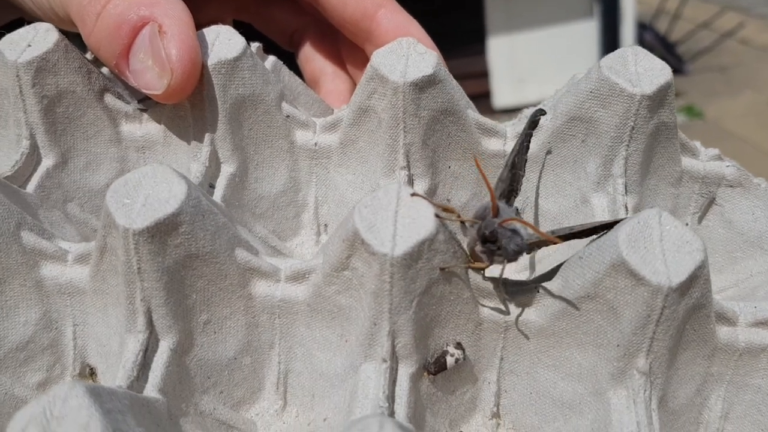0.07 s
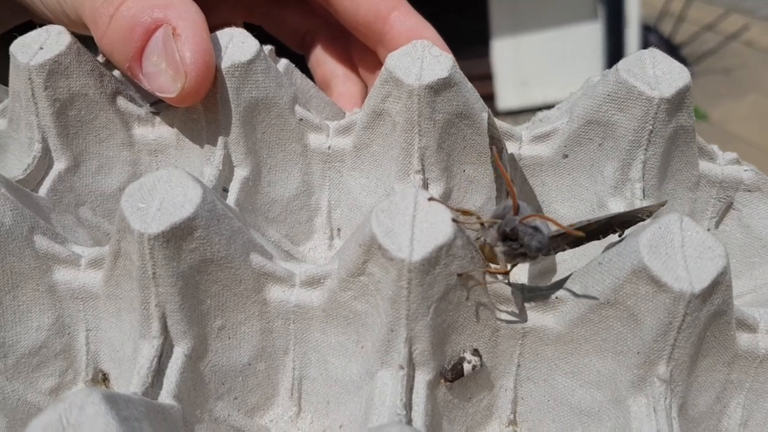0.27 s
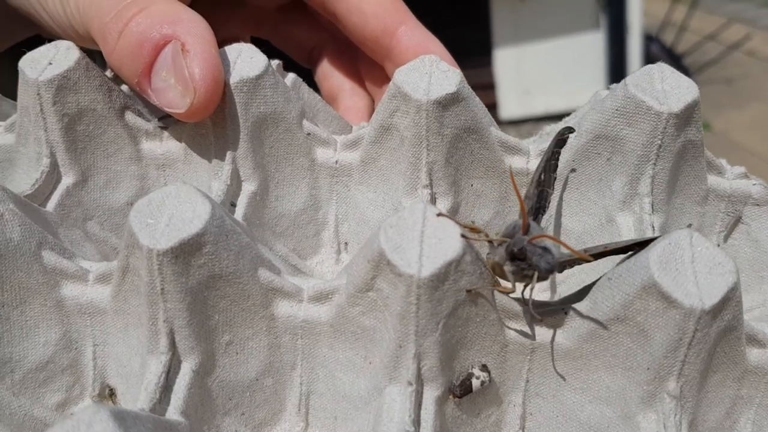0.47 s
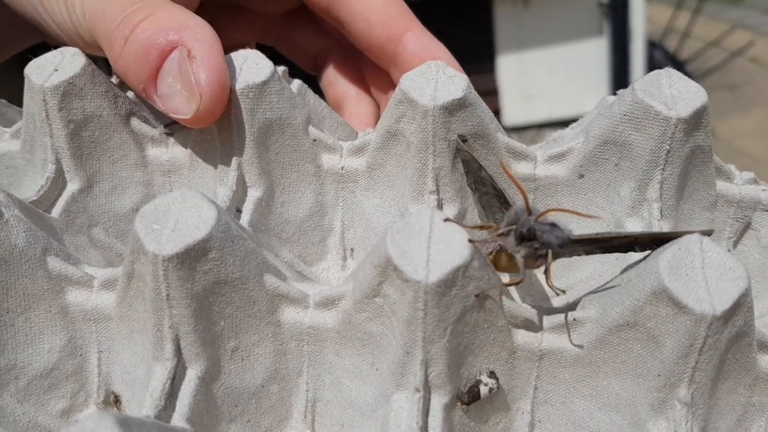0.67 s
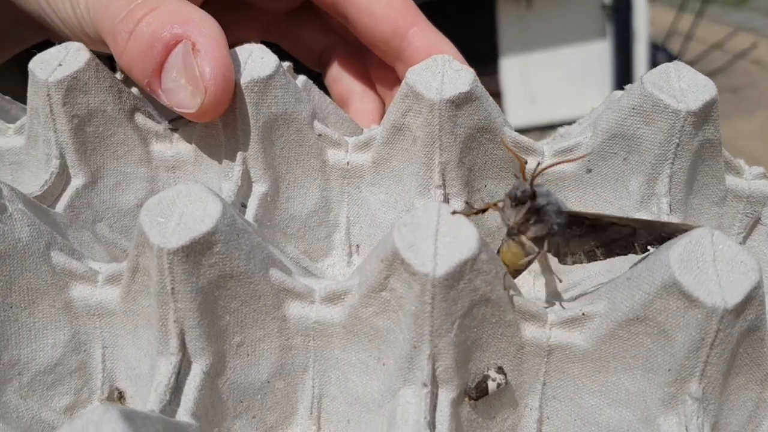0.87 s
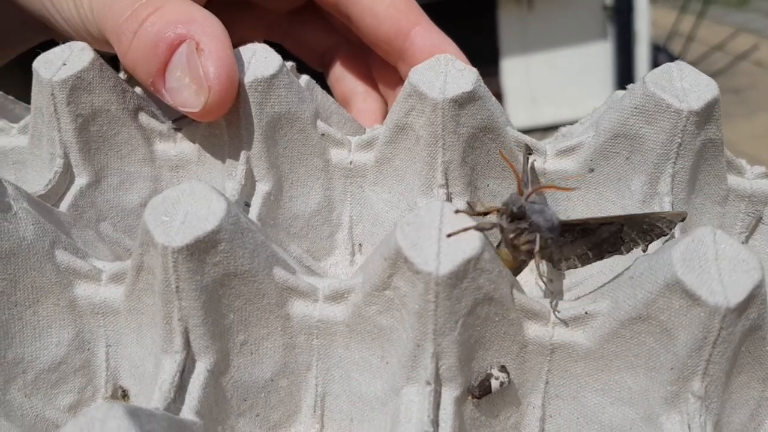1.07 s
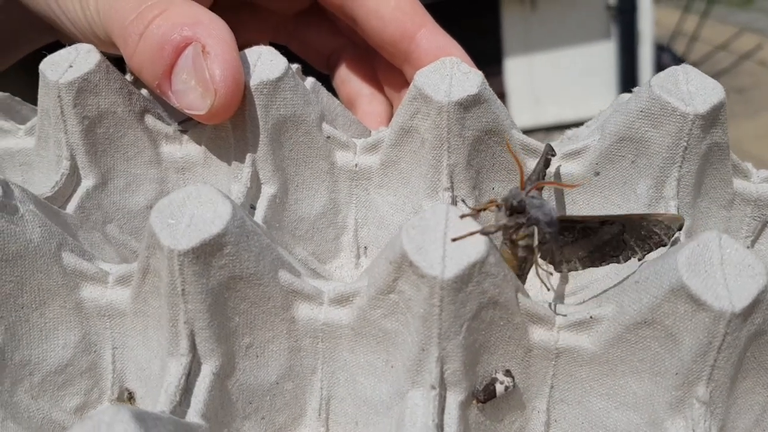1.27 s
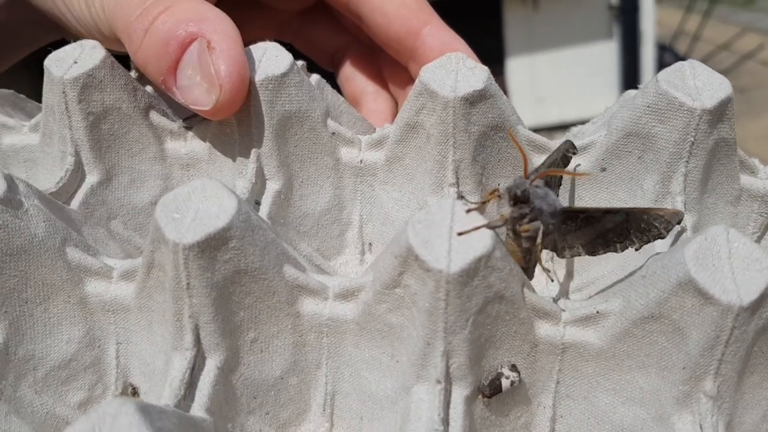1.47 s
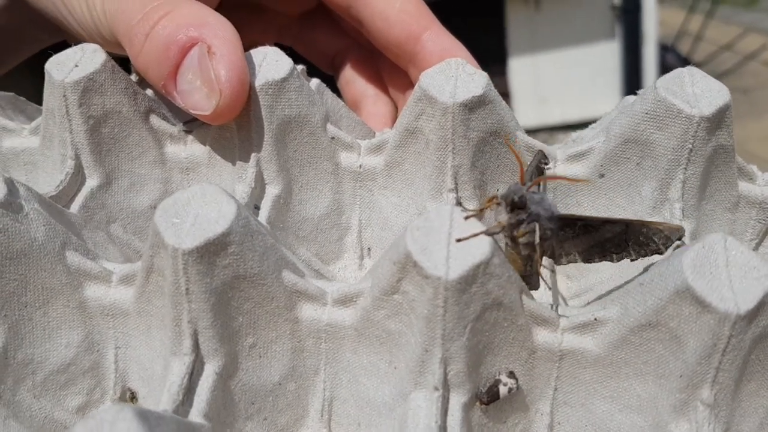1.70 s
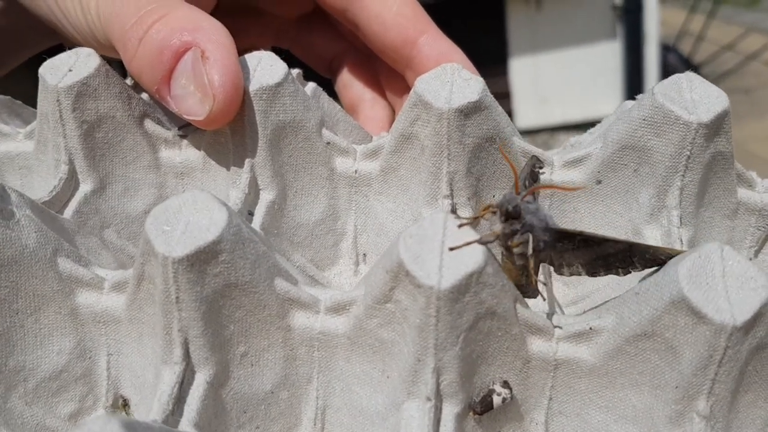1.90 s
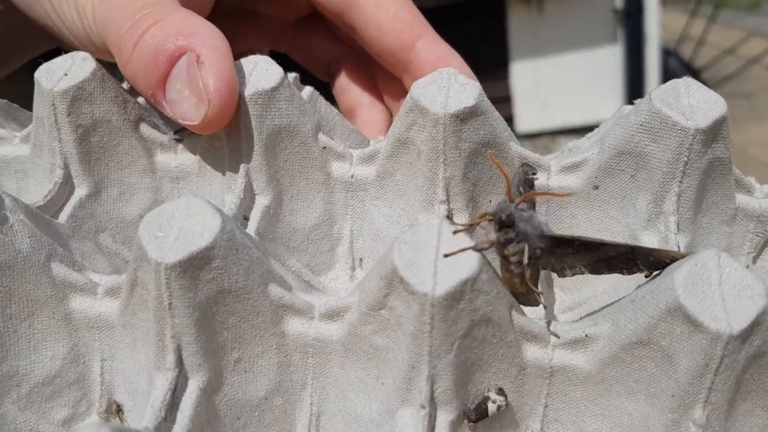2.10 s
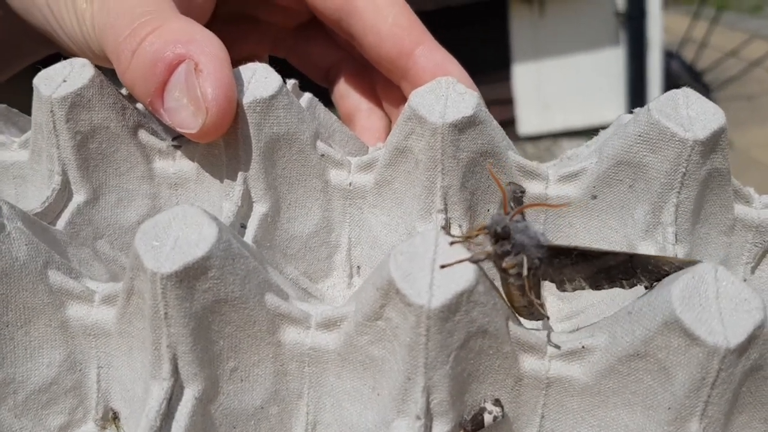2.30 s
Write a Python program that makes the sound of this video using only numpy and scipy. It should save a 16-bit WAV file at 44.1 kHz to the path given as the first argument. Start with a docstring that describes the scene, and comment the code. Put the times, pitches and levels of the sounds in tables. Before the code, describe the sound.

Moth wings ticking and fluttering on a cardboard egg tray, with wind rumble and faint birds.

```python
"""Moth on an egg tray

A moth beats its wings against a hand-held cardboard egg tray, close to the microphone: sharp ticks
at first, then a weaker flutter with scraping as it settles. Two soft knocks make the tray thump.
Small birds whistle across a yard, and puffs of wind buffet the two microphone openings
over a quiet outdoor hush."""
import sys
import numpy as np
from scipy import signal
from scipy.fft import rfft, irfft
from scipy.io import wavfile
from scipy.ndimage import uniform_filter1d

SR = 44100
rng = np.random.default_rng(int(sys.argv[2]) if len(sys.argv) > 2 else 0)


def generate_wav(sig):
    """Save sig (samples, or channels by samples) to the path in sys.argv[1] as 16-bit PCM at SR."""
    pcm = np.round(np.clip(np.atleast_2d(sig).T, -1, 1) * 32767).astype(np.int16)
    wavfile.write(sys.argv[1], SR, pcm)


N = 108045
TIME = np.arange(N) / SR


def gain(db):
    """Turn decibels into a number to multiply by."""
    return 10 ** (np.asarray(db) / 20)


def unit(x):
    """Scale a signal to an average strength (rms) of 1."""
    return x / np.sqrt(np.mean(x ** 2) + 1e-20)


def colour(x, curve):
    """Turn lows and highs up or down along a curve of (frequency [Hz], level [dB])."""
    hz, db = np.array(curve, float).T
    freqs = np.maximum(np.arange(N // 2 + 1) * SR / N, 1)
    return irfft(rfft(x) * gain(np.interp(np.log(freqs), np.log(hz), db)), N)


def noise(curve, alike=0.):
    """Stereo noise coloured by a curve; alike is the share common to left and right."""
    white = rng.standard_normal((3, N))
    return unit(colour(np.sqrt(alike) * white[2] + np.sqrt(1 - alike) * white[:2], curve))


def wander(hz):
    """A smooth random wobble of about plus or minus 1."""
    width = int(SR / hz)
    smoothed = uniform_filter1d(rng.standard_normal(N), width, mode="wrap")
    return unit(uniform_filter1d(smoothed, width, mode="wrap"))


def strike(at, rise_s, fade_s):
    """A loudness shape that rises quickly and dies away."""
    age = np.maximum(TIME - at, 0)
    fading = np.exp(-np.minimum(np.maximum(age - rise_s, 0) / fade_s, 20))
    return np.minimum(age / rise_s, 1) * fading


def swell(at, half_s):
    """A loudness shape like a smooth hill."""
    return np.exp(-np.minimum(((TIME - at) / half_s) ** 2, 40) / 2)


# Tone of the outdoor hush: (frequency [Hz], relative level [dB])
HUSH_TONE = [(240, -8.5), (400, -0.5), (1000, -11), (1750, -13), (2250, -8.5), (4500, -9), (6800, -12.5),
             (7900, -22), (12000, -19), (15500, -21.5)]
# How wide the hush sounds: (frequency [Hz], sides compared with centre [dB])
HUSH_WIDTH = [(500, -5.5), (1100, 5), (1700, 4), (2500, -5), (3600, 0.5)]
# Tone of distant low air: (frequency [Hz], relative level [dB])
RUMBLE_TONE = [(20, -42), (55, 1), (130, -11), (500, -26), (1200, -50)]

def outdoors():
    """A wide, quiet hush that eases very slightly, over the rumble of distant air."""
    centre, sides = noise(HUSH_TONE)
    hush = unit(centre + np.array([[1], [-1]]) * colour(sides, HUSH_WIDTH))
    return gain(-56.5 - 0.06 * TIME) * hush + gain(-61.5) * noise(RUMBLE_TONE, alike=0.44)


# Puffs of wind: (middle time [s], level [dB], left minus right [dB])
PUFFS = [(0.393, -38.5, -4), (0.489, -48.5, -16), (0.55, -51, -23.5), (0.859, -44.5, 15),
         (0.981, -41.5, 7.5), (1.019, -37, 3), (1.087, -43, 9), (1.16, -39, 9), (1.203, -36.5, -0.5),
         (1.254, -39, -10), (1.312, -41.5, -10.5), (1.369, -40.5, 11), (1.396, -41, -1), (1.512, -36, -0.5),
         (1.583, -37, -11), (1.681, -41.5, 8), (1.723, -34.5, -3.5), (1.808, -47.5, -21), (1.86, -34, -2.5),
         (1.902, -32, 1), (1.955, -43, 9), (2.0, -48, -19.5), (2.108, -39.5, -7.5), (2.153, -39.5, 3.5),
         (2.227, -45, 5), (2.273, -46, -10.5), (2.376, -56, 7)]
# Tone of the wind at speed 1: (frequency [Hz], relative level [dB])
WIND_TONE = [(20, -12), (62, 2), (105, -0.5), (150, -11.5), (240, -17), (400, -29.5), (1600, -66.5)]

def wind():
    """Puffs stir swirls at each microphone opening; stronger ones pass faster and sound higher."""
    swirls = noise(WIND_TONE)
    power = uniform_filter1d(swirls ** 2, int(0.0196 * SR), axis=1)
    swirls = swirls / np.sqrt(power)  # evened out, so the puffs set the loudness
    out = 0
    for at, db, balance in PUFFS:
        speed = 2 ** ((db + 39.5) / 15.5)  # 1 at -39.5 dB, doubling every 15.5 dB
        swept = np.array([np.interp(at + speed * (TIME - at), TIME, side) for side in swirls])
        stirring = gain(-10) * swell(at, half_s=0.042)  # weak movement around the puff
        shape = np.maximum(swell(at, half_s=0.013), stirring)
        out += gain(db + np.array([[balance], [-balance]]) / 2) * shape * swept
    return out


# Bird notes: (time [s], length [s], start pitch [Hz], middle pitch [Hz], end pitch [Hz],
# relative level [dB], trill depth [Hz])
BIRD_NOTES = [(0.05, 0.047, 5240, 4750, 4420, -48, 170), (0.139, 0.028, 5400, 4920, 4750, -44.5, 450),
              (0.163, 0.087, 4630, 4660, 4710, -49.5, 140), (0.186, 0.03, 3800, 2920, 2360, -42, 52),
              (0.211, 0.014, 3910, 3270, 2960, -43.5, 20), (0.247, 0.03, 2730, 3014, 3020, -41.5, 9.1),
              (0.344, 0.049, 5260, 5104, 4560, -44, 460), (0.442, 0.0744, 3950, 3790, 3880, -47, 440),
              (0.48, 0.055, 4080, 4150, 4130, -45.5, 190), (0.55, 0.054, 3970, 3340, 3030, -47.5, 330),
              (0.607, 0.048, 2794, 2466, 2720, -50.5, 250), (0.678, 0.031, 2270, 2395, 2580, -59.5, 110),
              (1.425, 0.036, 3710, 3870, 4580, -61.5, 40), (1.533, 0.028, 3600, 3950, 4030, -54.5, 73),
              (1.712, 0.12, 4720, 4628, 4625, -50.5, 170), (1.797, 0.051, 3955, 3835, 3470, -52.5, 180)]

def birds():
    """Small birds whistle sliding notes, some buzzing with a fast trill."""
    waver = 1 + 0.016 * wander(hz=630)
    flicker = gain(2 * wander(hz=250))
    trill_hz = 162.6 * (1 + 0.085 * wander(hz=47.5))
    out = np.zeros(N)
    for at, length, start, middle, end, db, depth in BIRD_NOTES:
        on = (TIME >= at) & (TIME < at + length)
        progress = (TIME[on] - at) / length
        slide = np.polyval(np.polyfit([0, .5, 1], [start, middle, end], 2), progress)
        trill = np.sin(2 * np.pi * np.cumsum(trill_hz[on]) / SR)
        hz = slide * waver[on] + depth * trill
        whistle = np.sqrt(2) * np.sin(2 * np.pi * np.cumsum(hz) / SR)
        ramp = np.minimum(np.minimum(progress, 1 - progress) / 0.2, 1)  # fade in and out
        out[on] += gain(db) * np.sin(np.pi / 2 * ramp) * flicker[on] * whistle
    return out


def yard(sound):
    """Sound crosses the yard directly and as many scattered echoes."""
    tail = unit(gain(-60 * TIME / 0.35))  # echoes fall 60 dB in 0.35 s
    echoes = gain(-4.5) * tail * rng.standard_normal((2, N)) / np.sqrt(N)
    return gain(-5) * sound + signal.fftconvolve(sound[None], echoes, axes=1)[:, :N]


# Soft knocks through the held tray: (time [s], relative level [dB], fading time [s])
KNOCKS = [(0.616, -26.5, 0.037), (0.788, -34.5, 0.039)]
# Low tones of the bending tray: (frequency [Hz], relative level [dB])
TRAY_TONES = [(66, 2.5), (97, 2), (131, 8), (153, 5.5), (172, -10)]
# Tone of the cardboard's crunch: (frequency [Hz], relative level [dB])
CRUNCH_TONE = [(300, 3), (1300, -37)]

def tray_thumps():
    """Soft knocks set the tray wobbling, with a dull crunch as the cardboard bends."""
    crunch = gain(-17) * noise(CRUNCH_TONE, alike=0.44)
    out = 0
    for at, db, fade in KNOCKS:
        wobble = sum(gain(level) * np.sin(2 * np.pi * hz * (TIME - at)) for hz, level in TRAY_TONES)
        out += gain(db) * strike(at, rise_s=0.015, fade_s=fade) * (wobble / 2 + crunch)
    return out


MOTH_ALIKE = 0.069  # share of the moth's noise common to left and right
# The moth rubs firmly on the tray: (middle time [s], half length [s], level [dB])
RUBS = [(0.746, 0.01, -48), (0.787, 0.0023, -50.5)]
# Tone of a rub: (frequency [Hz], relative level [dB])
RUB_TONE = [(600, -3), (2000, -6), (5500, 3), (8000, -11), (15000, -10)]
# Its wings slide lightly along the tray: (middle time [s], half length [s], level [dB])
RUSTLES = [(0.989, 0.044, -57.5), (2.413, 0.04, -62)]
# Tone of a rustle: (frequency [Hz], relative level [dB])
RUSTLE_TONE = [(1500, -4), (6500, 1.5), (10000, 0.5), (14000, -14)]

def moth_scrapes():
    """Scraping on rough cardboard: firm contact sounds duller, a light wing rustles like paper."""
    rub = sum(gain(db) * swell(at, half) for at, half, db in RUBS)
    rustle = sum(gain(db) * swell(at, half) for at, half, db in RUSTLES)
    grain = unit(gain(5 * wander(hz=410)))
    return grain * (rub * noise(RUB_TONE, MOTH_ALIKE) + rustle * noise(RUSTLE_TONE, MOTH_ALIKE))


# Wing tips hit the tray: (time [s], relative level [dB])
WING_HITS = [(0.036, -43.5), (0.0734, -48.5), (0.1038, -52), (0.1801, -42), (0.2187, -44), (0.291, -45),
             (0.3302, -47.5), (0.398, -48.5), (0.4351, -44), (0.506, -53), (0.5415, -50.5), (0.5797, -45),
             (0.621, -51), (0.6585, -45), (0.7327, -48), (0.8077, -41), (1.0483, -50.5), (1.5248, -53)]
# Tone of a hit's sharp crack: (frequency [Hz], relative level [dB])
CRACK_TONE = [(500, -18), (4000, -3), (11000, -3.5), (16000, -10.5)]
# Tone of the ringing cardboard: (frequency [Hz], relative level [dB])
RING_TONE = [(500, -13), (3000, -6), (5200, -1), (6600, -13.5), (9000, -36)]

def moth_wings():
    """Each wing hit cracks and rings the cardboard briefly; later the wings mostly just brush it."""
    rise_s, crack_fade_s, ring_fade_s = 0.00041, 0.0021, 0.0036
    drier_from_s, flutter_start_s, wingbeat_hz = 0.77, 0.88, 31.46
    crack, ring = np.zeros(N), np.zeros(N)
    for at, db in WING_HITS:
        ring_db = db - 9 if at > drier_from_s else db  # later hits are drier clicks with less ring
        crack += gain(db) * strike(at, rise_s, crack_fade_s)
        ring += gain(ring_db) * strike(at, rise_s, ring_fade_s)
    # the flutter: each beat is a little uneven in timing and strength
    for beat, (late, strength) in enumerate(rng.standard_normal((56, 2))):
        at = flutter_start_s + beat / wingbeat_hz + 0.0022 * late
        brush = gain(-55.5 + 2 * strength) * strike(at, rise_s, crack_fade_s)
        crack += brush
        ring += brush / 2
    return (gain(-1.5) * crack * noise(CRACK_TONE, MOTH_ALIKE)
            + gain(3) * ring * noise(RING_TONE, MOTH_ALIKE))


def scene():
    """Moth and tray up close, birds further off, wind on the microphone and a hush all around."""
    left, right = moth_wings() + moth_scrapes()
    lag_s = 0.00039  # the moth is to the right, so its sound reaches the left side later
    moth = np.array([np.roll(left, int(lag_s * SR)), right])
    return moth + tray_thumps() + yard(birds()) + wind() + outdoors()


def record(dry):
    """The recorder cuts off the highest treble, above 15750 Hz."""
    return signal.sosfilt(signal.ellip(10, .2, 70, 15750, fs=SR, output="sos"), dry)


dry = scene()
out = record(dry)
generate_wav(out)
```